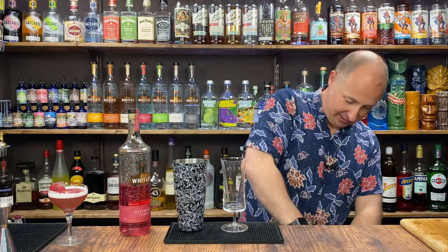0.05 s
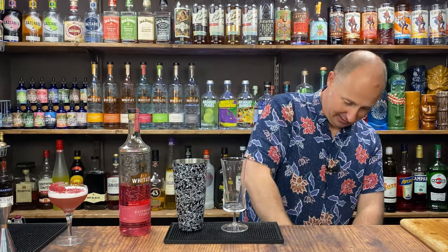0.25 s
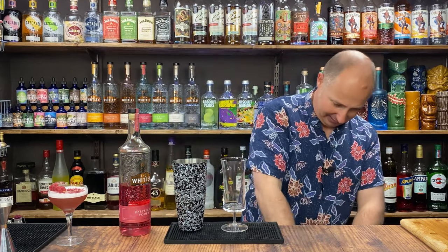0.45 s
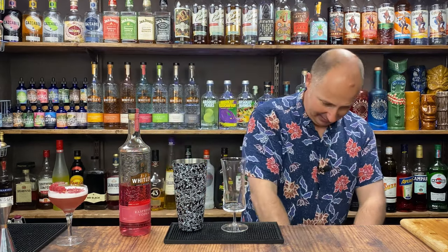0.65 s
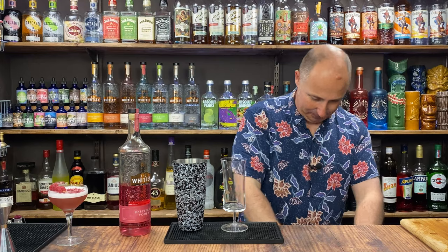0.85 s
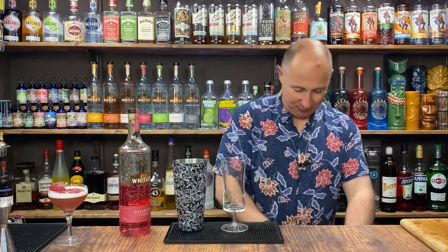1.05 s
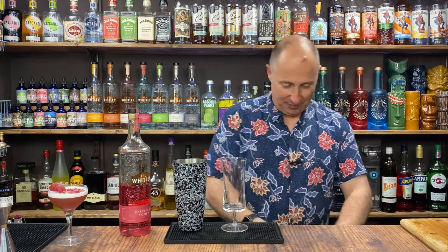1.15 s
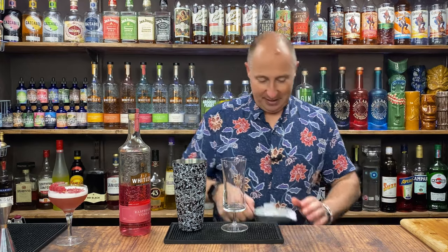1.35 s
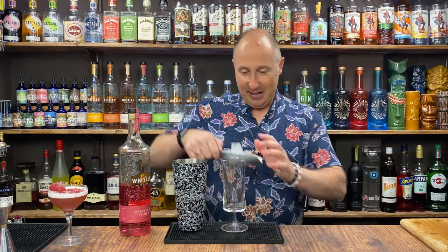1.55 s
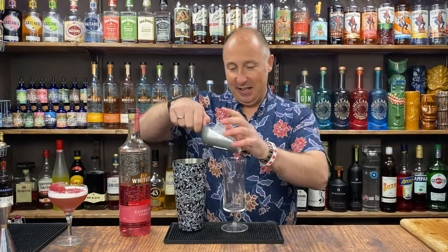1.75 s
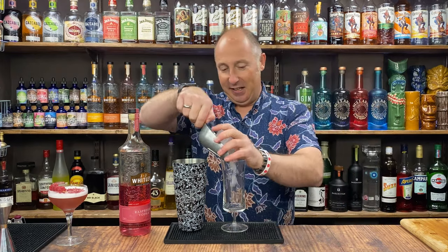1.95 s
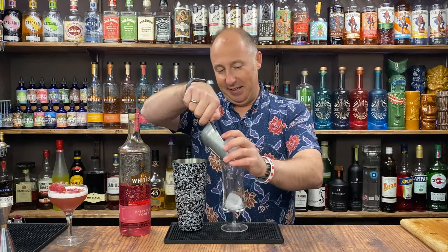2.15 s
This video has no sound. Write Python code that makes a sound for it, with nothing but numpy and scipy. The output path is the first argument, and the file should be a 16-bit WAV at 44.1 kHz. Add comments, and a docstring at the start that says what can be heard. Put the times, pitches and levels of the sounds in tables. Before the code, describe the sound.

Ice cubes rattle and knock as a metal scoop digs through a hollow bin. The scoop lifts out, ice slides softly along it, and a few cubes clink into a tall glass, heard close in a small, fairly dry room.

```python
"""Ice cubes knock and churn as a metal scoop digs through a bin, ringing the scoop and the hollow bin.
The scoop lifts out with a few last knocks and a beating note. Ice slides softly along it and ticks
on its lip. Cubes drop into a tall glass, on its wall, then its bottom, and ring the glass and the air
inside. Heard close up in a small, fairly dry room."""
import sys
import numpy as np
from scipy import signal
from scipy.io import wavfile

SR = 44100
rng = np.random.default_rng(int(sys.argv[2]) if len(sys.argv) > 2 else 0)


def digitize_waveform(pressure):
    """Quantize a signal to 16-bit integers and store it at the path in sys.argv[1].

    Rows of a 2-D input are taken as channels; values are limited to [-1, 1].
    """
    field = np.atleast_2d(pressure).T
    bounded = np.clip(field, -1, 1)
    quanta = np.round(bounded * 32767).astype(np.int16)
    wavfile.write(sys.argv[1], SR, quanta)


N = 96931

# Room decay. Each row: low edge in Hz, high edge in Hz, t60 in seconds.
ROOM_BANDS = [(61, 590, .4), (680, 3700, 0.25), (3500, 11100, 0.28), (9000, 19400, 0.21)]
BIN_WET_DB, GLASS_WET_DB, EDGE_HZ = -14.5, -14.5, 15850
# Spectra of room tone, bin rumble, sliding ice, crunch on the glass and ice in the bin.
# Each row: frequency in Hz, gain in dB.
FLOOR_SPECTRUM = [(32, -28), (55, 3.5), (85, -14.5), (200, -17), (600, -24), (3000, -35.5), (15500, -35.5)]
RUMBLE_SPECTRUM = [(25, -18.5), (55, -2), (95, -7.5), (150, 2), (400, -13.5)]
SLIDE_SPECTRUM = [(100, -29.5), (320, -16), (600, -20.5), (1200, -16), (1780, 1), (2200, -9), (3200, -22.5),
                  (7000, -27.5), (15000, -35.5)]
CRUNCH_SPECTRUM = [(70, -7), (300, -13.5), (900, -3.5), (1650, -2.5), (2300, -0.5), (3000, -12),
                   (5000, -4.5), (6300, -4), (7900, 1.5), (9500, -3.5), (12000, -3.5), (15500, -14)]
ICE_SPECTRUM = [(40, -49.5), (95, -20.5), (150, -8), (250, -6.5), (320, 1.5), (480, -1), (700, -1.5),
                (1000, 3.5), (1650, 5), (2400, 2), (3200, -2.5), (4400, -5.5), (7500, -5), (9400, -8),
                (11500, -6), (15500, -21.5)]
FLOOR_DB, RUMBLE_DB, CRUNCH_DB, CRUNCH_T60_S = -69.5, -45, -21.5, .1

# Ice sliding on the scoop. Each row: time in seconds, level in dB.
SLIDE_LEVELS = [(1.3, -82), (1.39, -64.5), (1.45, -59.5), (1.58, -66), (1.77, -69), (1.83, -67.5),
                (2.19, -69.5)]
# Cubes ticking on the lip. Each row: start in seconds, level in dB.
LIP_TICKS = [(1.8045, -28.5), (1.81, -35), (1.8559, -37), (1.8613, -25.5)]
SCRAPE_DB, GRIT_DB, GRIT_HI_HZ, TOUCH_T60_S = -50.5, -6.5, 9000, .065
# Modes of the scoop's lip, the scoop among the ice, the hollow bin and the air in the glass.
# Each row: frequency in Hz, level in dB, t60 in seconds.
LIP_MODES = [(1460, 2, 0.024), (3325, -7, 0.024), (5820, -9, 0.03), (7000, -9.5, 0.015), (8400, -12, .025)]
SCOOP_MODES = [(317.7, -5.5, .25), (999, -2.5, 0.33), (1612, -6.5, 0.15), (1715, -8, 0.15),
               (2376, -8, 0.15)]
BIN_MODES = [(142.2, -4.5, 0.4), (419, -4.5, .18), (572.4, -6, 0.21), (654, -2, 0.84), (850, -4, 0.39)]
AIR_MODES = [(526.7, -8.5, 0.074), (1375, -2.5, 0.042)]
LIP_SPREAD, SCOOP_DB, BIN_DB, AIR_RISE = .04, -23.5, -30.5, .099
WALL_S, WALL_DB, WALL_T60_S, WALL_NOTES_HZ = .6255, 1, .075, (785, 865, 975)
LIFT_S, DAMP_S, DAMP_T60_S = 1.146, 1.323, .061
FREE_HZ, FREE_BEAT_HZ, FREE_T60_S, FREE_DB, FREE_TWIN_DB = 989, 17, .75, -33, -5

# Cubes striking the glass. Each row: start in seconds, level in dB, depth (0 wall, 1 bottom),
# air column in dB, pitch ratio, treble in dB, undamped time in seconds.
GLASS_HITS = [(1.9282, -7, 0.035, -12, 1, -7, 0.018), (1.9346, -16.5, 0.11, -14, 1.1, 1.5, .009),
              (1.9431, -20.5, 0.33, 6.5, 1.1, -2, .1), (1.972, -26, 0.49, 6, 1.16, 6, 0.019),
              (1.9927, 0.5, 0.1, 0, 1, -1, 0.035), (2.0039, -5.5, 0.18, 3.5, 1, 1, 0.11),
              (2.101, -20.5, 1, -14, 1, -1, 0.024), (2.1289, -19.5, 0.94, 0.5, 1.05, 4, 0.022),
              (2.1363, 0, 0.93, 6.5, 0.95, -6.5, 0.039), (2.18, -19.5, 0.14, -4, 1.05, 1.5, .01)]
# Glass modes. Each row: frequency in Hz, wall-hit level in dB, bottom-hit level in dB, t60 in seconds.
GLASS_MODES = [(1820, 4.5, -17, 0.12), (1810, -25, -28, 0.25), (1930, -17, -15.5, 0.44),
               (2200, -32, -6, .047), (3165, -16.5, -31, 0.19), (4290, -13.5, -14.5, 0.17),
               (4780, -37, -8.5, 0.2), (4980, -15, -24, 0.1), (5590, -7.5, -23, 0.086),
               (7300, -9.5, -18, 0.11), (7850, -3.5, -8, 0.08), (8200, -9.5, -28, .05),
               (9300, -17, -8, 0.11), (9640, -15, -9, 0.22), (10130, -12.5, -12, 0.13),
               (11630, -9, -13, 0.037), (12950, -24, -11, .1), (14700, -17, -20, .069)]
GLASS_DB, GLASS_LO_HZ, TREBLE_HZ = -22, 443, 4000
PAIR_SPLIT, PAIR_DB, DETUNE, SPOT_SPREAD_DB = .0089, -1.5, .0024, -1

# Cubes hitting the scoop and each other. Each row: start in seconds, level, treble and bass in dB.
ICE_KNOCKS = [(.001, 3.5, -2, -10), (0.0147, 6.5, 3, -10.5), (0.0892, 1, -20, -6), (.112, 0.5, -22, 1.5),
              (.164, 1.5, 2, -21), (.186, 8, 3.5, -24), (0.191, 7, -9, -31), (0.209, -14, 10, -11),
              (.244, 4.5, -3, 1), (0.296, -1, 1, 5.5), (0.3092, 1, 3, 4.5), (0.315, 4.5, -2, -0.5),
              (0.339, 2, 0, 1), (.379, 1.5, -4, -2), (.389, -5, 2, 11), (.407, 0, -2, 4),
              (.419, 4.5, -13, 0.5), (0.4781, -4.5, 1.5, 10.5), (0.544, -5, 1.5, -3),
              (0.6117, -6.5, 5.5, -3), (0.625, 4, 0, -1), (0.637, -1, -4.5, -9.5), (0.6867, -3.5, -3, -1.5),
              (0.7332, -7.5, -24, 2), (0.7602, -4, -19, -3.5), (.778, -5, -7, 0.5), (0.7879, -5, -5, -3),
              (0.835, 1, 0.5, -4), (0.8531, -8, 4.5, -21), (.872, -9.5, 5.5, 5.5), (0.8934, -5.5, -9, 1.5),
              (0.9502, -13, 11.5, -11), (.96, -7.5, -4, 3), (1.0928, -12, 1.5, -15.5),
              (1.1224, 1, -1, -0.5), (1.1456, 1, -11, -13.5), (1.153, -0.5, -3, -9), (1.168, -3, 1.5, -1),
              (1.19, -13, -7, 5), (1.2198, -3, -12, 0), (1.2521, -6.5, -11.5, -2.5),
              (1.276, -9, -0.5, -19.5), (1.413, -42.5, 12.5, -11)]
KNOCK_DB, BASS_DB = -1.5, -3
SNAP_LO_HZ, SNAP_T60_S, SNAP_DB, SNAP_GROWTH = 10200, .013, -6, 1.4
# Bass, body and treble of a contact. Each row: low edge in Hz, high edge in Hz, t60 in seconds.
CONTACT_BANDS = [(60, 748, 0.065), (763, 3610, 0.066), (3300, 14950, 0.067)]
CUBE_LO_HZ, CUBE_HI_HZ, CUBE_T60_S, CRACK_S, CRACK_DB = 1205.4, 2639, .054, .0004, -17
# Small contacts as the scoop pushes. Each row: time in seconds, level in dB, treble in dB.
CHURN_LEVELS = [(0, 1, 4), (.075, -10, -1.5), (.12, -1.5, 0), (.24, 0.5, 1), (.28, -1.5, -0.5),
                (.33, -1.5, -1), (.42, -1.5, 2.5), (.5, -3, -5.5), (.55, -12, 2), (.65, -10, -1.5),
                (.73, -12.5, -1), (.81, -18, 3), (.9, -10.5, -2.5), (1.0, -20.5, 4), (1.09, -16, -4.5),
                (1.115, -57, 1.5), (1.17, -8, 1.5), (1.24, -34.5, 6), (1.29, -22, 4), (1.38, -42.5, 6.5),
                (1.7, -81, -1)]
CHURN_DB, CONTACTS_PER_S, SIZE_SPREAD_DB, CUBE_COUNT = -14.5, 700, 3.5, 24
CRACKLES_PER_S, CRACKLE_DB, CRACKLE_T60_S = 260, -11, .009


def amp(db):
    """Decibels to gain."""
    return 10 ** (np.asarray(db) / 20)


def unit(x):
    """Scales to unit energy."""
    return x / np.sqrt(np.sum(x ** 2) + 1e-20)


def add(mix, start_s, sound):
    """Mixes a sound in at start_s."""
    part = mix[max(round(start_s * SR), 0):][:len(sound)]
    part += sound[:len(part)]


def curve(rows, column=1):
    """One table column, interpolated per sample."""
    rows = np.array(rows)
    return np.interp(np.arange(N) / SR, rows[:, 0], rows[:, column])


def band(x, lo_hz, hi_hz):
    """Causal band-pass."""
    sos = signal.butter(3, [lo_hz, min(hi_hz, .48 * SR)], "band", fs=SR, output="sos")
    return signal.sosfilt(sos, x)


def colour(x, spectrum):
    """Minimum-phase filter through (Hz, dB) points."""
    hz, db = np.transpose(spectrum)
    grid_hz = abs(np.fft.fftfreq(8192, 1 / SR)) + 1
    log_gain = np.log(amp(np.interp(np.log(grid_hz), np.log(hz), db)))
    taps = np.fft.ifft(np.exp(np.conj(signal.hilbert(log_gain)))).real[:4096]
    return signal.fftconvolve(x, taps)[:len(x)]


def decay(t, t60_s):
    """Falls 60 dB in t60_s."""
    return np.exp(-np.log(1000) * t / max(t60_s, 1e-3))


def ring(t, hz, t60_s):
    """One struck mode."""
    return np.sin(2 * np.pi * hz * t) * decay(t, t60_s)


def ring_modes(t, modes, pitch=1):
    """A set of modes struck together."""
    return sum(amp(db) * ring(t, hz * pitch, t60_s) for hz, db, t60_s in modes)


def hiss(spectrum):
    """Steady coloured noise, unit rms."""
    return unit(colour(rng.standard_normal(N), spectrum)) * np.sqrt(N)


def burst(lo_hz, hi_hz, t60_s):
    """A dry click in one band."""
    t = np.arange(SR // 6) / SR
    return unit(band(rng.standard_normal(len(t)) * decay(t, t60_s), lo_hz, hi_hz))


def clicks(per_s):
    """Random impulses: many small, a few large."""
    sizes = amp(SIZE_SPREAD_DB * np.minimum(rng.exponential(1, N), np.pi)) * rng.choice([-1, 1], N)
    return sizes * (rng.random(N) < per_s / SR)


def room_tone():
    """Faint, steady low noise."""
    return amp(FLOOR_DB) * hiss(FLOOR_SPECTRUM)


def room(x, wet_db):
    """Direct sound plus scattered reflections from shelves and bottles."""
    t = np.arange(SR // 2) / SR
    taps = rng.choice([-1, 1], len(t)) * (rng.random(len(t)) < 3000 / SR) * (t > .004)
    tail = unit(sum(band(taps, lo, hi) * decay(t, t60_s) for lo, hi, t60_s in ROOM_BANDS))
    return x + amp(wet_db) * signal.fftconvolve(x, tail)[:N]


def rumble():
    """The heap shifts against the bin while the scoop pushes."""
    return amp(RUMBLE_DB + curve(CHURN_LEVELS)) * hiss(RUMBLE_SPECTRUM)


def slide():
    """Wet ice rubs along the scoop as it is carried and tipped."""
    return amp(curve(SLIDE_LEVELS)) * hiss(SLIDE_SPECTRUM)


def lip_touch():
    """A gritty touch on the scoop's lip; pitch depends on where the ice lies."""
    t = np.arange(SR // 6) / SR
    lip = unit(ring_modes(t, LIP_MODES, pitch=1 + LIP_SPREAD * rng.uniform(-1.1, 1)))
    grit = amp(GRIT_DB) * burst(LIP_MODES[0][0], GRIT_HI_HZ, TOUCH_T60_S)
    return band(lip + grit, CUBE_LO_HZ, EDGE_HZ)


def tipping():
    """Cubes tick and scrape on the tipped lip until the first one falls."""
    t = np.arange(N) / SR
    on_lip = (t > LIP_TICKS[0][0]) * (t < GLASS_HITS[0][0])
    scrape = amp(SCRAPE_DB) * clicks(CONTACTS_PER_S) * on_lip
    out = signal.fftconvolve(scrape, lip_touch())[:N]
    for start_s, db in LIP_TICKS:
        add(out, start_s, amp(db) * lip_touch())
    return out


def scoop():
    """The scoop knocks the bin wall once; lifted clear, it rings until settling ice damps it."""
    out, t = np.zeros(N), np.arange(SR // 2) / SR
    knock = unit(sum(rng.choice([-1, 1]) * ring(t, hz, WALL_T60_S) for hz in WALL_NOTES_HZ))
    add(out, WALL_S, amp(WALL_DB) * knock)
    note = ring(t, FREE_HZ, FREE_T60_S)
    twin = amp(FREE_TWIN_DB) * ring(t, FREE_HZ - FREE_BEAT_HZ, FREE_T60_S)
    damping = decay(np.maximum(LIFT_S + t - DAMP_S, 0), DAMP_T60_S)
    add(out, LIFT_S, amp(FREE_DB) * (note + twin) * damping)
    return out


def glass_ring(t, depth, pitch, treble_db):
    """Glass modes for one hit; the high ones are beating pairs that vary from hit to hit."""
    out = np.zeros(len(t))
    for hz, wall_db, bottom_db, t60_s in GLASS_MODES:
        high = hz > TREBLE_HZ
        spot, load, split = rng.uniform(-1, 1, size=3)
        hz = hz * pitch * (1 + high * DETUNE * load)
        twin = high * rng.choice([-1, 1]) * amp(PAIR_DB) * ring(t, hz * (1 + PAIR_SPLIT * split), t60_s)
        db = wall_db + depth * (bottom_db - wall_db) + high * (treble_db + SPOT_SPREAD_DB * spot)
        out += rng.choice([-1, 1]) ** high * amp(db) * (ring(t, hz, t60_s) + twin)
    return out


def glass():
    """Each cube crunches on the glass, ringing it and the air inside; its next touch damps the ring."""
    out, t = np.zeros(N), np.arange(SR // 3) / SR
    for start_s, db, depth, air_db, pitch, treble_db, free_s in GLASS_HITS:
        wall = glass_ring(t, depth, pitch, treble_db)
        # The hollow air note sounds higher on the bottom hits.
        air = amp(air_db) * ring_modes(t, AIR_MODES, pitch=1 + AIR_RISE * depth)
        clink = amp(GLASS_DB) * band(wall + air, GLASS_LO_HZ, SR / 2)
        spectrum = [(hz, gain_db + treble_db * (hz > TREBLE_HZ)) for hz, gain_db in CRUNCH_SPECTRUM]
        crunch = amp(CRUNCH_DB) * colour(rng.standard_normal(len(t)) * decay(t, CRUNCH_T60_S), spectrum)
        damping = decay(np.maximum(t - free_s, 0), TOUCH_T60_S)
        add(out, start_s, amp(db) * damping * (clink + crunch))
    return out


def contact():
    """One cube hit as bass, body and treble: a crack, a scatter through the heap, three cube notes."""
    t = np.arange(SR // 6) / SR
    crack = amp(CRACK_DB) * np.exp(-t / CRACK_S)
    bass, body, treble = [unit(band(rng.standard_normal(len(t)) * (crack + decay(t, t60_s)), lo, hi))
                          for lo, hi, t60_s in CONTACT_BANDS]
    notes_hz = rng.uniform(CUBE_LO_HZ, CUBE_HI_HZ, size=3)
    notes = unit(sum(rng.choice([-1, 1]) * ring(t, hz, CUBE_T60_S) for hz in notes_hz))
    return amp(BASS_DB) * bass, unit(body + notes), treble


def knocks():
    """Cubes hit the scoop and each other, the brightest with the sharpest snap."""
    out = np.zeros(N)
    for start_s, db, treble_db, bass_db in ICE_KNOCKS:
        bass, body, treble = contact()
        snap = amp(SNAP_DB + SNAP_GROWTH * treble_db) * burst(SNAP_LO_HZ, EDGE_HZ, SNAP_T60_S)
        knock = amp(bass_db) * bass + body + amp(treble_db) * treble + snap
        add(out, start_s, amp(KNOCK_DB + db) * knock)
    return out


def churn():
    """Small contacts and crackles as the scoop pushes; each cube has its own sound."""
    push = amp(CHURN_DB + curve(CHURN_LEVELS))
    brightness = amp(curve(CHURN_LEVELS, column=2))
    contacts = push * clicks(CONTACTS_PER_S)
    crackles = push * brightness * amp(CRACKLE_DB) * clicks(CRACKLES_PER_S)
    out, owner = np.zeros(N), rng.integers(0, CUBE_COUNT, N)
    for cube in range(CUBE_COUNT):
        bass, body, treble = contact()
        own = owner == cube
        out += signal.oaconvolve(own * contacts, bass + body)[:N]
        out += signal.oaconvolve(own * contacts * brightness, treble)[:N]
        out += signal.oaconvolve(own * crackles, burst(TREBLE_HZ, EDGE_HZ, CRACKLE_T60_S))[:N]
    return out


def ice_bin():
    """Knocks and churn ring the metal scoop and the hollow bin."""
    ice = colour(knocks() + churn(), ICE_SPECTRUM)
    t = np.arange(SR // 2) / SR
    metal = amp(SCOOP_DB) * unit(ring_modes(t, SCOOP_MODES))
    hollow = amp(BIN_DB) * unit(ring_modes(t, BIN_MODES))
    return ice + signal.fftconvolve(ice, metal + hollow)[:N]


def scene():
    """Bin, scoop and glass over the room tone, in mono."""
    digging = room(ice_bin(), BIN_WET_DB) + rumble() + scoop()
    pouring = slide() + room(tipping() + glass(), GLASS_WET_DB)
    return (digging + pouring + room_tone())[None]


def record(dry):
    """Low-pass at EDGE_HZ."""
    taps = signal.firwin(511, EDGE_HZ, window=("kaiser", 9), fs=SR)
    return signal.oaconvolve(dry, taps[None], "same")


dry = scene()
out = record(dry)
digitize_waveform(out)
```